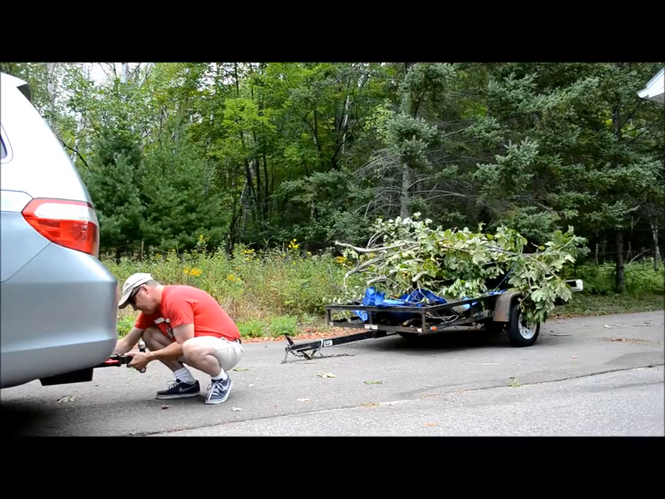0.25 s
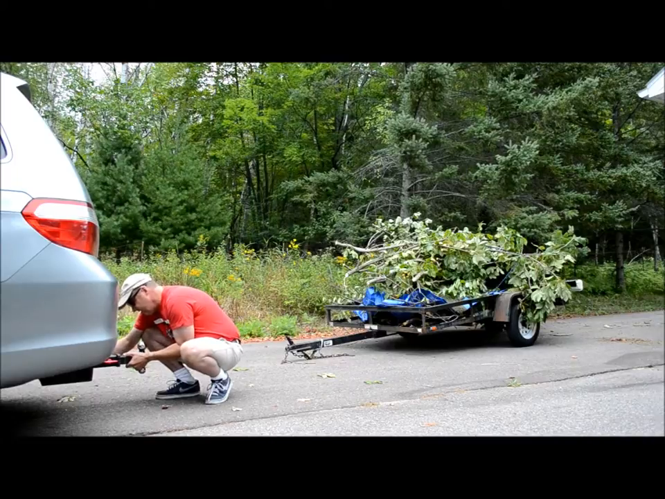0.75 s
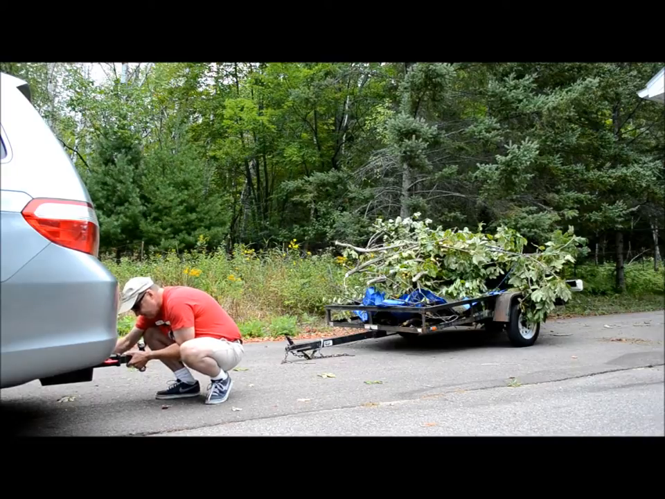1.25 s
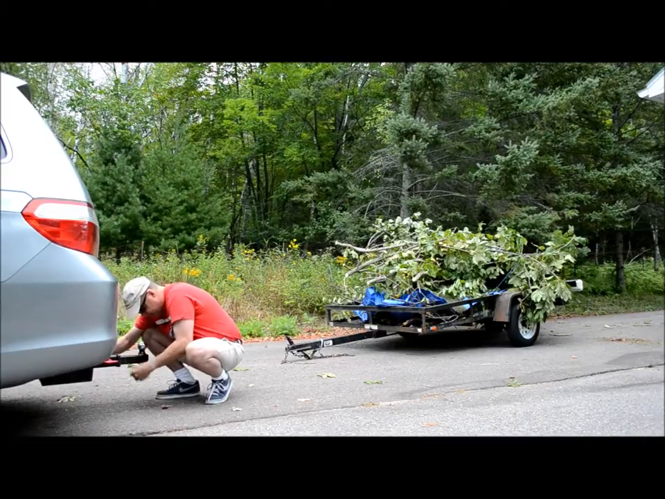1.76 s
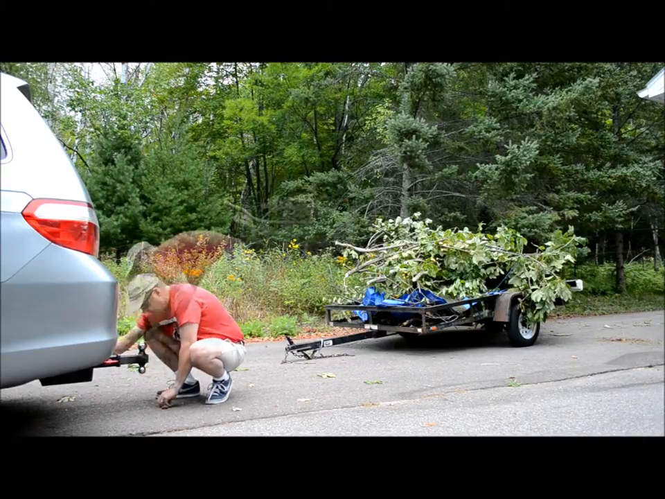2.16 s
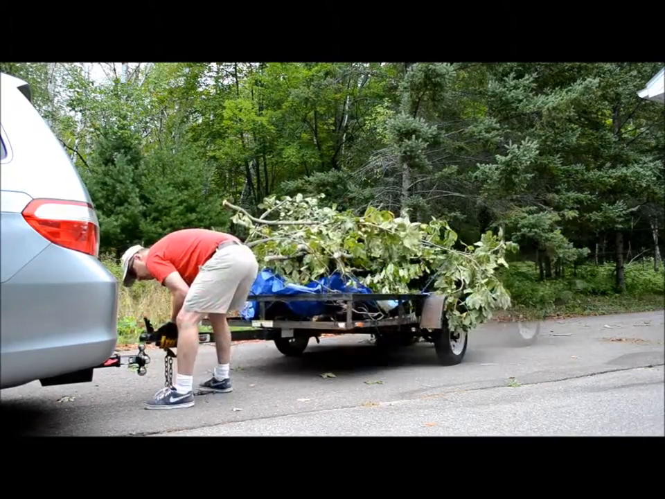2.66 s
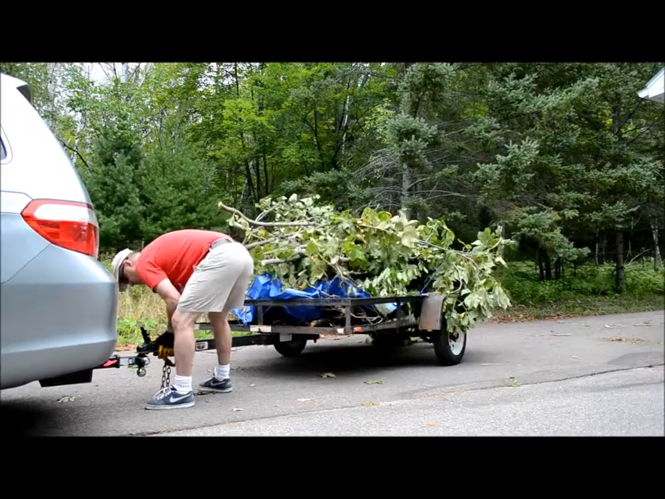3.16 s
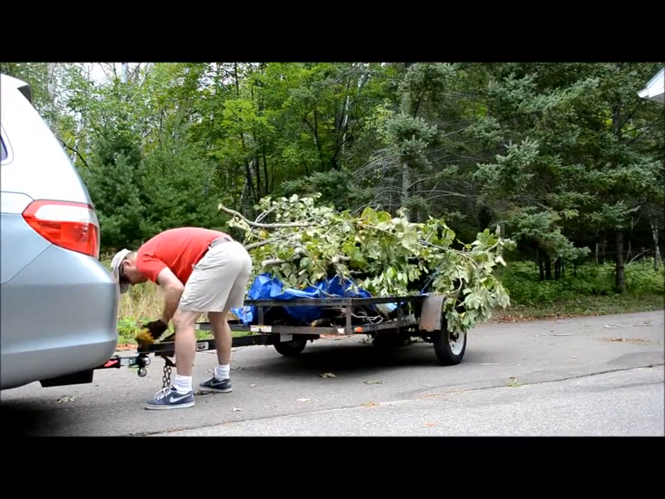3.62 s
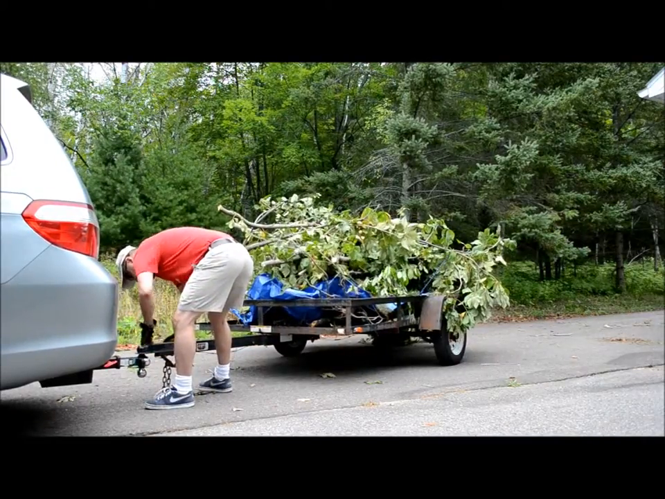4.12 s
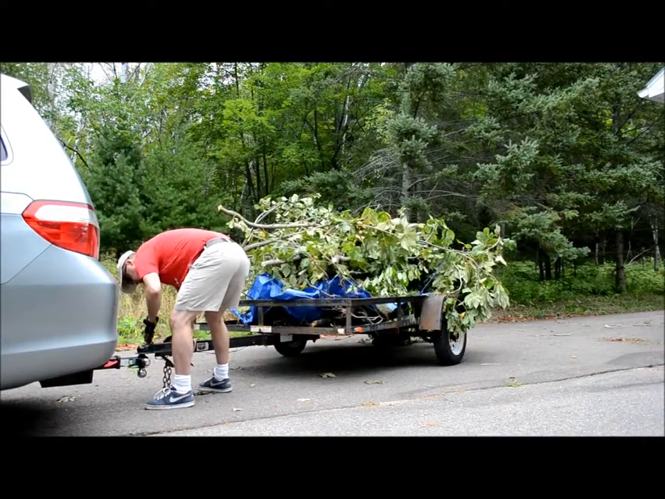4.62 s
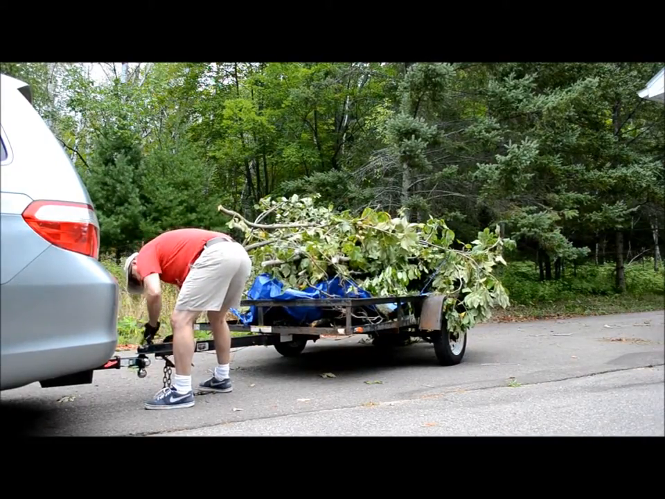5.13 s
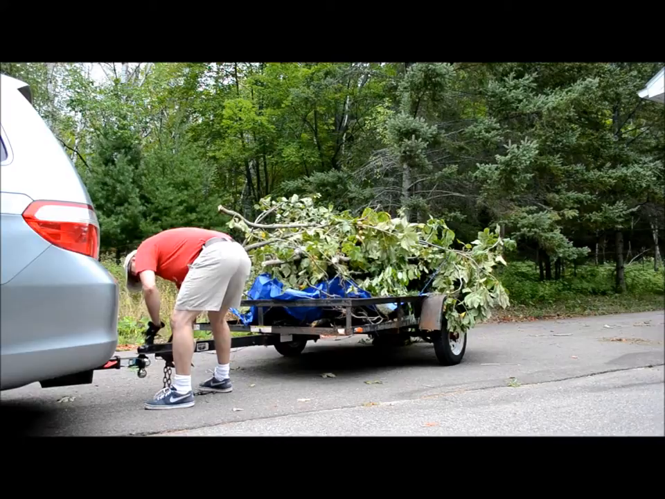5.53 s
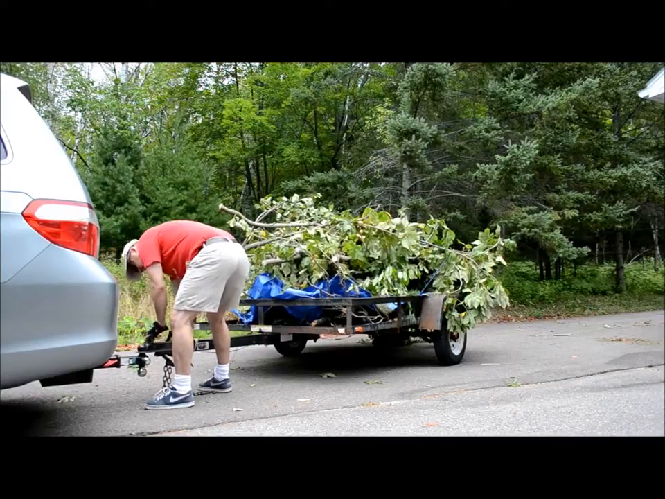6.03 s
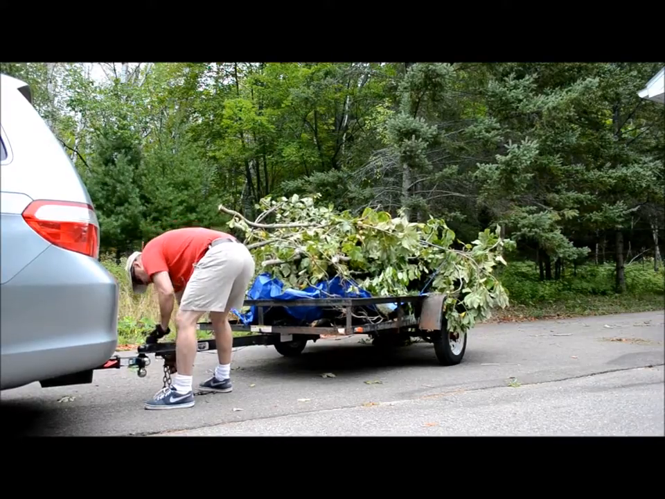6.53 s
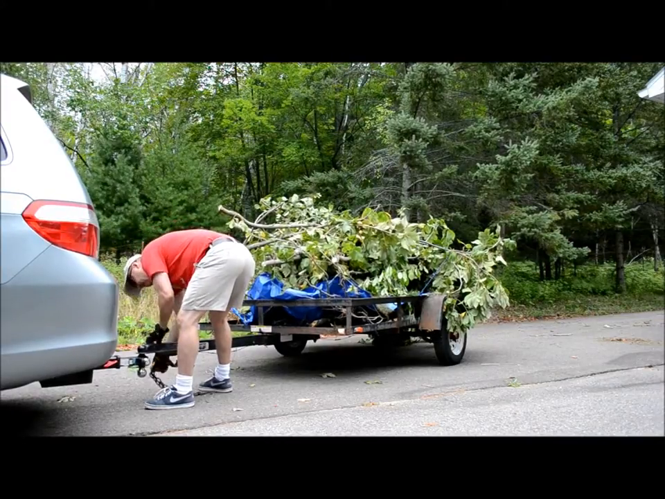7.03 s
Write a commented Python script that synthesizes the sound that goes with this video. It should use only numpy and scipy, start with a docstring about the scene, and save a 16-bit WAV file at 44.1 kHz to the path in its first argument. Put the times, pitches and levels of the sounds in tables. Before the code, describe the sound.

Dull metal clunks of a drawbar in a car hitch, then a trailer coupler knocking and its latch snapping sharply four times, over faint outdoor hiss.

```python
"""A steel drawbar and pin are worked into a car's hitch, then a trailer coupler is dropped on the ball, its latch
snaps four times and a chain hook swings, outdoors on asphalt. Each blow is a short rattle of contacts filtered by
dense decaying clatter, plus clear decaying modes. Grazed links jingle, grit ticks, steel squeaks once. Delayed
noise tails are the echoes from car and trees; shaped noise makes rustling leaves, a hiss and a faint hum."""
import sys
import numpy as np
from scipy import signal
from scipy.fft import rfft, irfft
from scipy.io import wavfile
from scipy.ndimage import uniform_filter1d

SR = 44100
rng = np.random.default_rng(int(sys.argv[2]) if len(sys.argv) > 2 else 0)


def to_wav(s):
    """Save 16-bit WAV."""
    ch = np.atleast_2d(s).T  # columns
    pcm = np.round(np.clip(ch, -1, 1) * 32767)  # PCM
    wavfile.write(sys.argv[1], SR, pcm.astype(np.int16))


N = 321048
RING_SAMPLES = 8192  # length of one blow or one mode


def gain_of(db):
    """Decibels to amplitude."""
    return 10 ** (np.asarray(db) / 20)


def evened(x):
    """Scales to rms 1."""
    return x / np.sqrt(np.mean(x ** 2) + 1e-20)


def read(points, hz):
    """Interpolates a curve on a log-frequency axis."""
    point_hz, value = np.transpose(points)
    return np.interp(np.log(hz + 1), np.log(point_hz + 1), value)


def add(mix, start_s, sound):
    """Mixes a sound in at start_s."""
    part = mix[round(start_s * SR):][:len(sound)]
    part += sound[:len(part)]


def noise(count, db_of, size):
    """Noise of rms 1 whose spectrum over time follows db_of(Hz, s)."""
    overlap = 3 * size // 4
    hz, t, z = signal.stft(rng.standard_normal(count), SR, nperseg=size, noverlap=overlap)
    shaped = z * gain_of(db_of(hz[:, None], t))
    return evened(signal.istft(shaped, SR, nperseg=size, noverlap=overlap)[1][:count])


def causal(hz_db):
    """Minimum-phase filter for a gain in dB from zero to the top frequency."""
    mirrored_db = np.r_[hz_db, hz_db[-2:0:-1]]
    log_gain = np.log(gain_of(mirrored_db))
    return np.exp(np.conj(signal.hilbert(log_gain)))[:len(hz_db)]


def sines(modes):
    """One decaying sine per mode of the steel, all faded out by the end of the ring."""
    hz, db, t60_s = np.transpose(modes)[:, :, None]
    t = np.arange(RING_SAMPLES) / SR
    decay = gain_of(db - 60 * t / np.maximum(t60_s, .01))
    return decay * np.sin(2 * np.pi * hz * t) * np.hanning(2 * RING_SAMPLES)[RING_SAMPLES:]


# Countless small modes. Each row: frequency in Hz, relative density in dB per Hz.
CLATTER_SPECTRUM = [(40, -3.5), (120, -15), (300, -2), (1000, 2), (3000, 9.5), (7000, 9), (9000, 10),
                    (10600, 0.5), (11800, -32)]
# Their decay. Each row: frequency in Hz, t60 in s.
CLATTER_DECAY = [(150, 0.2), (600, 0.13), (2500, 0.047), (9000, 0.012)]
STRIKE_RISE_S = 0.00038


def blow(rings, boom_db, rattle_s, db, bass_db, treble_db, ring_db, loud_hz, rise_s=STRIKE_RISE_S):
    """Uneven, fading contacts excite the clatter; the clear modes ring from the start of the blow."""
    t, hz = np.arange(RING_SAMPLES) / SR, np.fft.rfftfreq(RING_SAMPLES, 1 / SR)
    chance = rng.random((2, RING_SAMPLES))
    is_contact = abs(chance[0] - .5) < .06
    contacts = np.sign(chance[0] - .5) * gain_of(27.0 * chance[1] ** 2) * is_contact
    contacts *= np.minimum(t / rise_s, 1) * np.exp(-(t / max(rattle_s, .001)) ** 1.053)

    def clatter_db(f, s):
        return read(CLATTER_SPECTRUM, f) - 60 * s / read(CLATTER_DECAY, f)
    clatter = noise(RING_SAMPLES, clatter_db, size=256)
    mode_gains = gain_of(2 * rng.standard_normal(len(rings)))
    ring = mode_gains @ rings * np.minimum(t / 0.0019, 1)

    octaves = np.log2((hz + 1) / loud_hz)  # the place struck favours one band
    deep_db = bass_db + boom_db
    tilt_db = read([(30, deep_db - 20), (90, deep_db), (180, deep_db + 3.5),
                    (260, bass_db - 7), (480, bass_db), (1500, 0.0019),
                    (3200, 0.38 * treble_db), (6000, treble_db), (10500, treble_db),
                    (11900, treble_db - 10.0)], hz)
    band_db = 5 * np.exp(-(octaves / 0.11) ** 2)
    clatter = irfft(rfft(contacts) * rfft(clatter) * causal(tilt_db + band_db))
    far_db = -20 * np.minimum(abs(octaves), 2)  # far modes hardly move
    ring = irfft(rfft(ring) * causal(far_db))
    return gain_of(db) * (clatter / abs(clatter).max() + gain_of(ring_db) * ring / abs(ring).max())


# Drawbar and pin in the hitch. Each row: start in s, clatter peak in dB, bass tilt in dB, treble tilt in dB,
# ring peak in dB against the clatter, favoured band in Hz.
HITCH_HITS = [(0.031, -45, 14, -21, -12, 447), (0.047, -35.5, 12, -7.5, -23, 710),
              (0.055, -23.5, 23.5, -17.5, 0, 671), (0.074, -23, 4.5, -18.5, -20, 471),
              (0.089, -28.5, 3, -31.5, -4.5, 1180), (0.114, -34, 14, -40, 3.5, 964),
              (0.176, -21.5, 1.5, -40, -30, 4800), (0.19, -31, 10, -45.5, -22, 2130),
              (0.204, -38, 18, -38, 3, 472), (0.248, -31, -4.5, -40.5, -0.5, 1420),
              (0.276, -35.5, 15, -16, -7, 3170), (0.329, -43.5, 19, -21, -2, 1280),
              (0.51, -57.5, 9, -2, 5, 420), (0.533, -41, 34.5, -33, 4, 472),
              (0.543, -35, 24, -55, -1.5, 490), (0.575, -46, 28, -42, -9.5, 625),
              (0.905, -42, 30.5, -31, -1.5, 422), (0.962, -48, 27, -24, -3, 430),
              (1.054, -35, 12, -40, -26, 440), (1.086, -29, 15, -39, -5.5, 1380),
              (1.103, -31.5, 6, -40, -20, 3910), (1.123, -38, 34, -35.5, 3.5, 900),
              (1.208, -41.5, 13.5, -25, -6, 450), (1.259, -32.5, 8, -32.5, -2.5, 1250),
              (1.263, -40.5, 12, -28, -3, 2800), (1.358, -39, 8.5, -10.5, -34.5, 2055),
              (1.423, -43.5, 19, -31, 1, 534), (1.465, -39.5, 21.5, -52, -9.5, 420),
              (1.534, -47.5, 15, -40.5, -13.5, 535), (1.864, -36, -27, -28.5, -15, 1890),
              (1.866, -45, -17, -9, -2, 5600)]
# Each row: mode in Hz, relative level in dB, t60 in s before the common fade.
HITCH_MODES = [(185, -2, .2), (440, 0, .09), (581, -1, .1), (700, -5, .08), (980, -4, .1), (1235, -3, .13),
               (1382, -1, .13), (2130, -4, .08), (2772, -4, .15), (3159, 1, .3), (3862, -2, .4),
               (4194, -8, .35), (4850, -4, .08)]
HITCH_BOOM_DB, HITCH_RATTLE_S = -5.5, 0.018  # deep bass against bass: the car's body booms with the hitch


def hitch_blows(steel):
    """Drawbar and pin strike the hitch, which rings at its own modes."""
    rings = sines(HITCH_MODES)
    for start_s, *how in HITCH_HITS:
        add(steel, start_s, blow(rings, HITCH_BOOM_DB, HITCH_RATTLE_S, *how))


# Modes for knocks and latch. Each row: mode in Hz, relative level in dB, t60 in s before the common fade.
COUPLER_MODES = [(194, -2, .25), (365, -4, .15), (465, 0, .09), (1030, -6, .08), (1400, -6, .07),
                 (2993, -5, .06), (3430, -3, .2), (3563, -7, .2), (4406, -2, .25), (4538, -4, .2),
                 (5019, -12, .25), (5140, -9, .25), (6700, -2, .06), (7245, -9, .25), (8330, -8, .2)]
LATCH_BOOM_DB, LATCH_RATTLE_S = -13, 0.014
# Knocks of coupler, latch and chain. Each row: start in s, clatter peak in dB, bass tilt in dB, treble tilt in dB,
# ring peak in dB against the clatter, favoured band in Hz.
KNOCKS = [(2.811, -27.5, 8, -21, -8.5, 630), (2.845, -31.5, 14.5, -11.5, -20, 2020),
          (2.888, -31, 21.5, -10.5, 1.5, 415), (2.927, -28, 8, -4.5, -10, 3440),
          (2.95, -27, 6.5, -8.5, -10.5, 440), (2.979, -35.5, 4.5, -15, -14.5, 300),
          (3.088, -24, 2, -16, -31.5, 850), (3.128, -28, 17, -9, -6.5, 469),
          (3.146, -14.5, 0.5, -14, -34, 1395), (3.187, -27, 7, -5.5, -5.5, 371),
          (3.219, -31.5, 15.5, -18, -12, 442), (3.266, -36, -6, -16.5, -15, 484),
          (4.019, -26, -3.5, -6, -30.5, 2260), (4.048, -46.5, 13, -15, -19, 1970),
          (4.417, -43.5, 14, 4, -11.5, 2660), (4.481, -42.5, -1.5, 1, -17, 5500),
          (4.499, -40, -8.5, 0.5, -13, 2680), (4.526, -46, 0, -12, -3, 2700),
          (4.681, -32.5, 10.5, -26, -23.5, 3500), (4.921, -35.5, 0.5, -4.5, -27, 2390),
          (5.029, -48, -4, -8.5, -25, 3320), (5.159, -31.5, 15.5, -14, -7, 443.6),
          (5.62, -31, 10.5, -3.5, -8, 1500), (5.649, -43, 0, -40, -18.5, 1284),
          (5.987, -52.5, 12, -9, 8.5, 464), (6.031, -22.5, 2, -4, -28, 1473),
          (6.069, -40.5, 22, -30, -19, 1000), (6.274, -44, 3, -16, -16, 3428),
          (6.791, -46, 8, -19, -15.5, 463), (6.828, -44, 12, -3, -17, 3430),
          (7.075, -48, 13, -5.5, -9, 430)]
COUPLER_BOOM_DB, KNOCK_RATTLE_S = -4.5, 0.017
SEATED_S = 3.5  # the coupler sits on the ball: later knocks boom no more than the latch does


def knocks(steel, rings):
    """Knocks of coupler, latch and chain; those after SEATED_S boom less."""
    for start_s, *how in KNOCKS:
        boom_db = COUPLER_BOOM_DB if start_s < SEATED_S else LATCH_BOOM_DB
        add(steel, start_s, blow(rings, boom_db, KNOCK_RATTLE_S, *how))


# Latch. Each row: slam in s, slam clatter peak in dB, slide against slam in dB, slide band in Hz, bass tilt in dB,
# treble tilt in dB, slam ring in dB against its clatter, slam band in Hz, bounce delay in s,
# bounce ring in dB against its clatter, bounce band in Hz.
SNAPS = [(3.863, -15, -14, 4520, -1.5, -4, -3.5, 3740, 0.02, -15, 4000),
         (4.634, -9, -10.5, 4500, -3.5, 0.5, -24, 3580, 0.018, -29, 8950),
         (5.092, -11.5, -7.5, 4500, 2, 3.5, -40, 3500, .015, -10, 1520),
         (6.147, -15, -3, 3060, 4, 4.5, -25.5, 5050, .012, -9.5, 7400)]
SLIDE_LEAD_S, SLIDE_RISE_S, SLIDE_RATTLE_S, SLIDE_RING_DB = .017, 0.00277, 0.019, -11
BOUNCE_DB, BOUNCE_TREBLE_DB = -7, -3  # against the slam


def latch_snaps(steel, rings):
    """The latch slides, slams and bounces once, more weakly, on the coupler's modes."""
    for (slam_s, db, slide_db, slide_hz, bass_db, treble_db, ring_db, slam_hz,
         bounce_s, bounce_ring_db, bounce_hz) in SNAPS:
        slide = blow(rings, LATCH_BOOM_DB, SLIDE_RATTLE_S, db + slide_db, bass_db, treble_db,
                     SLIDE_RING_DB, slide_hz, SLIDE_RISE_S)
        slam = blow(rings, LATCH_BOOM_DB, LATCH_RATTLE_S, db, bass_db, treble_db, ring_db, slam_hz)
        bounce = blow(rings, LATCH_BOOM_DB, LATCH_RATTLE_S, db + BOUNCE_DB, bass_db,
                      treble_db + BOUNCE_TREBLE_DB, bounce_ring_db, bounce_hz)
        add(steel, slam_s - SLIDE_LEAD_S, slide)
        add(steel, slam_s, slam)
        add(steel, slam_s + bounce_s, bounce)


# Modes of the small parts. Each row: mode in Hz, relative level in dB, t60 in s before the common fade.
PIN_MODES = [(6900, 3, 0.266), (7060, -5, .2), (7460, -14, 0.45), (8500, -3, 0.184), (10180, -2, 0.092),
             (11250, -9.5, 0.26)]
HOOK_MODES = [(2126, -16, .2), (2519, -16, .1), (3240, -20, .15), (3774, -3, .12), (5093, -4, .1),
              (6772, -4, .15), (8565, 0, .2), (11380, -24, .2)]
# A sliding chain keeps them ringing. Each row: start in s, hold in s, level in dB.
PIN_SLIDES = [(2.196, 0.024, -61.5), (2.364, .05, -59)]
HOOK_SLIDES = [(7.01, 0.0076, -59), (7.135, 0.0088, -45), (7.168, 0.017, -48), (7.205, .07, -44.5)]
JINGLE_RISE_S, PIN_FALL_DB_PER_S, HOOK_FALL_DB_PER_S = .011, 600, 190


def jingle(modes, rows, fall_db_per_s):
    """Links graze a part at random, 400 times a second on average, each mode at random strength: it flickers."""
    start_s, hold_s, db = np.transpose(rows)[:, :, None]
    t = np.arange(start_s.min() - .2, (start_s + hold_s).max() + .2, 1 / SR)
    rise = np.clip((t - start_s) / JINGLE_RISE_S, 0, 1) ** 2
    falling_s = np.maximum(t - start_s - JINGLE_RISE_S - hold_s, 0)
    level = rise * gain_of(db - fall_db_per_s * falling_s)
    grazes = rng.standard_normal((len(modes), len(t))) * (rng.random(len(t)) < 400 / SR)
    sound = signal.fftconvolve(grazes, sines(modes), axes=1)[:, :len(t)].sum(0)
    return t[0], evened(sound) * level.max(0)


# Small links and grit. Each row: start in s, peak in dB.
TICK_TIMES = [(1.924, -45.5), (2.0014, -44.5), (2.0144, -46), (2.1066, -47.5), (2.1544, -46), (2.4708, -44),
              (6.6598, -49), (6.768, -49.5), (6.8313, -45), (7.031, -40.5), (7.1381, -41.5)]


def ticks(steel):
    """Tiny bright snaps: bandpassed noise dying within milliseconds."""
    for start_s, db in TICK_TIMES:
        snap = rng.standard_normal(200) * np.exp(-np.arange(200) / 54.0)
        snap = signal.lfilter(*signal.butter(3, [5000, 10000], "bandpass", fs=SR), snap)
        add(steel, start_s, gain_of(db) * snap / abs(snap).max())


# Steel slips on steel. One row: length in s, first frequency in Hz, last frequency in Hz, peak in dB.
SQUEAK_SWEEP = (.011, 9200, 7000, -19)
SQUEAK_S = 6.137


def squeak(length_s, from_hz, to_hz, db):
    """A fast falling whistle."""
    hz = np.linspace(from_hz, to_hz, round(length_s * SR))
    whistle = np.sin(2 * np.pi * np.cumsum(hz) / SR)
    return gain_of(db) * whistle * signal.windows.tukey(len(hz), .6)


# Echo decay. Each row: frequency in Hz, t60 in s.
YARD_DECAY = [(200, 1), (1500, 0.57), (5000, 0.48), (10000, 0.4)]
YARD_DB = -14  # share sent back


def yard(x):
    """Echoes from car, ground and trees: two noise tails alternate smoothly, so the grain keeps changing."""
    out, turn = np.zeros(N), np.pi * np.arange(N) / SR / .09
    for share in (np.cos(turn), np.sin(turn)):
        tail = noise(SR, lambda f, s: -60 * s / read(YARD_DECAY, f), size=256)
        delayed_tail = np.r_[np.zeros(300), tail / np.linalg.norm(tail)]
        out += signal.fftconvolve(x * share, delayed_tail)[:N]
    return gain_of(YARD_DB) * out


def flicker(s, rms_db):
    """Slightly smoothed random level in dB, one value per noise frame."""
    return rms_db * evened(uniform_filter1d(rng.standard_normal(len(s)), size=5))


# Rustle. Each row: frequency in Hz, relative density in dB per Hz.
LEAVES_SPECTRUM = [(12, -31.5), (20, -16), (204, -8), (662, -1), (736, -8), (1100, -4), (2950, -12.5),
                   (5910, -13), (7720, -26.5), (8830, -21), (11800, -52), (15400, -63), (22000, -120)]
LEAVES_DB = -65.5  # rms


def leaves():
    """Rustle throughout: shaped noise of flickering level."""
    return gain_of(LEAVES_DB) * noise(N, lambda f, s: read(LEAVES_SPECTRUM, f) + flicker(s, 0.99), size=1024)


# Each row: frequency in Hz, relative density in dB per Hz.
HISS_SPECTRUM = [(12, -48), (20, -26.5), (65, -1.5), (114, -12), (204, 1.5), (233, -2.5), (480, -1),
                 (1100, 2), (6580, -4), (7130, -8.5), (10400, -14.5), (11800, -53.5), (15400, -55),
                 (22000, -120)]
# Each row: time in s, level in dB.
HISS_COURSE = [(1.672, -84), (1.685, -58.5), (2.0, -60), (2.6, -60.5), (3.6, -59.5), (4.3, -63.5),
               (5.4, -62), (6.6, -62), (7.28, -59)]


def hiss():
    """Shaped noise that sets in suddenly and flickers a little."""
    sound = noise(N, lambda f, s: read(HISS_SPECTRUM, f) + flicker(s, 0.157), size=1024)
    return sound * gain_of(np.interp(np.arange(N) / SR, *np.transpose(HISS_COURSE)))


# One row: centre in Hz, width in Hz, rms level in dB.
HUM_BAND = (117.3, 4.9, -80)


def hum():
    """Noise in a band so narrow that it wavers like an unsteady tone."""
    centre_hz, width_hz, db = HUM_BAND

    def band_db(f, s):
        return -10 * np.log10(1 + (2 * (f - centre_hz) / width_hz) ** 4) + 0 * s
    return gain_of(db) * noise(N, band_db, size=16384)


def scene():
    """All the steel, its echoes and the background."""
    steel = np.zeros(N)
    hitch_blows(steel)
    coupler_rings = sines(COUPLER_MODES)
    knocks(steel, coupler_rings)
    latch_snaps(steel, coupler_rings)
    add(steel, *jingle(PIN_MODES, PIN_SLIDES, PIN_FALL_DB_PER_S))
    add(steel, *jingle(HOOK_MODES, HOOK_SLIDES, HOOK_FALL_DB_PER_S))
    ticks(steel)
    add(steel, SQUEAK_S, squeak(*SQUEAK_SWEEP))
    return (steel + yard(steel) + leaves() + hiss() + hum())[None]


EDGE_HZ = 11900


def record(dry):
    """Lowpass at EDGE_HZ: the band limit."""
    lowpass = signal.firwin(511, EDGE_HZ, window=("kaiser", 9), fs=SR)
    return signal.oaconvolve(dry, lowpass[None], "same")


dry = scene()
out = record(dry)
to_wav(out)
```